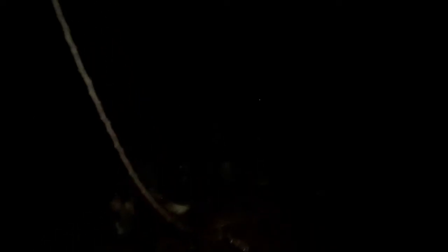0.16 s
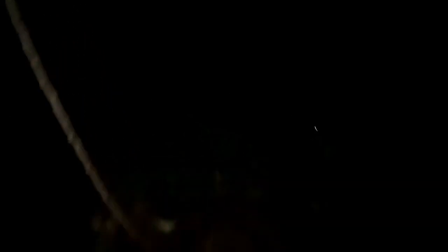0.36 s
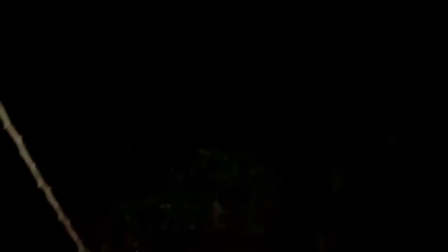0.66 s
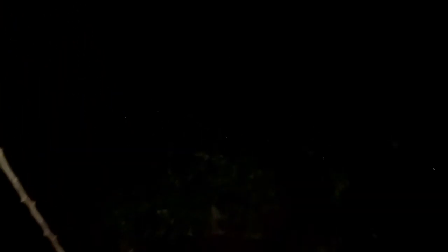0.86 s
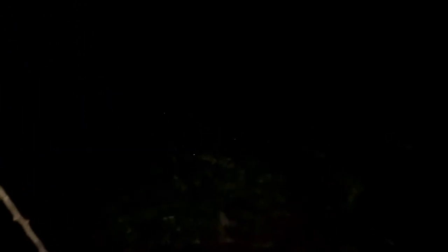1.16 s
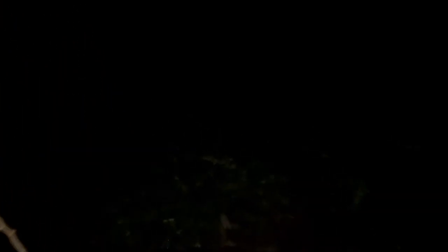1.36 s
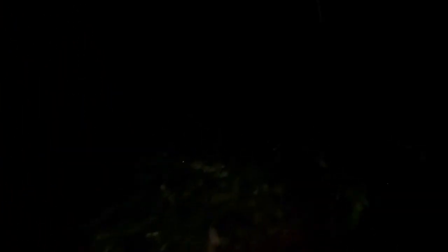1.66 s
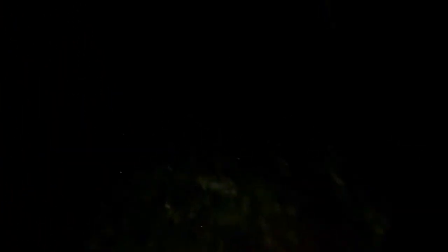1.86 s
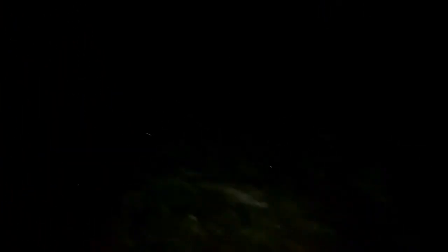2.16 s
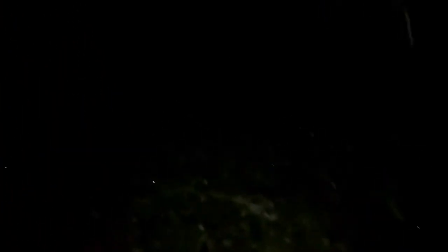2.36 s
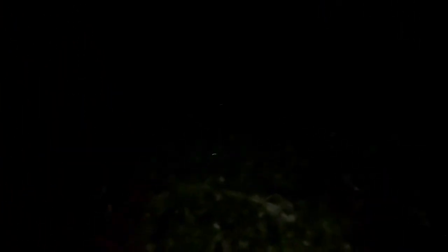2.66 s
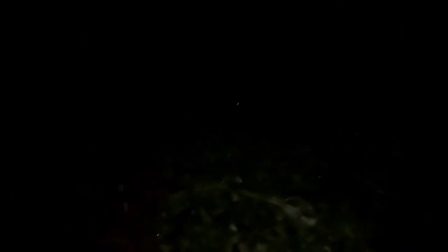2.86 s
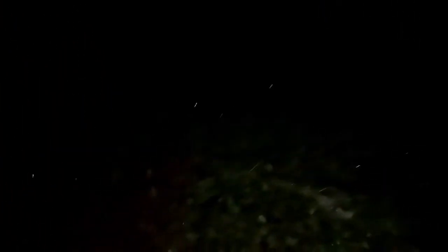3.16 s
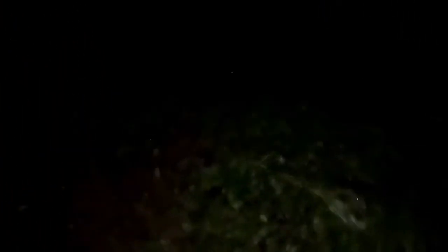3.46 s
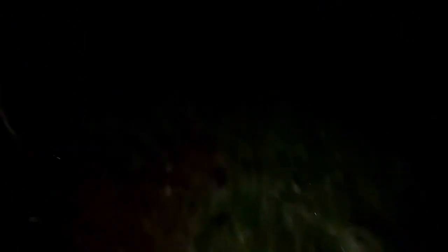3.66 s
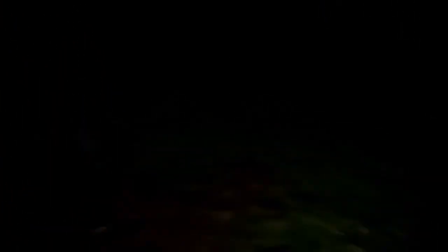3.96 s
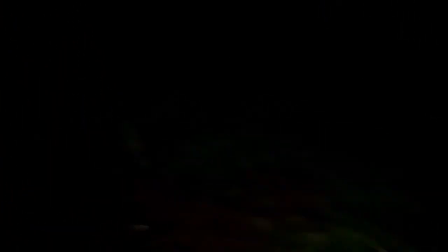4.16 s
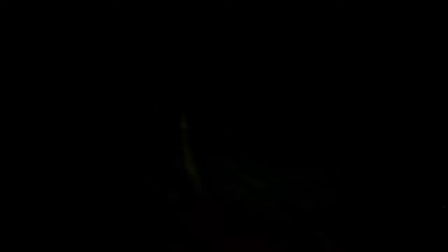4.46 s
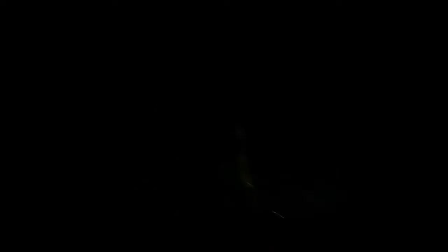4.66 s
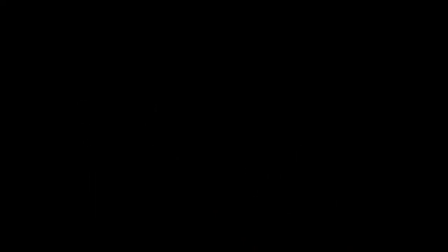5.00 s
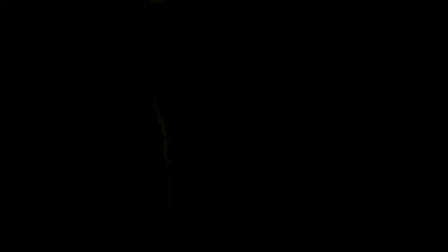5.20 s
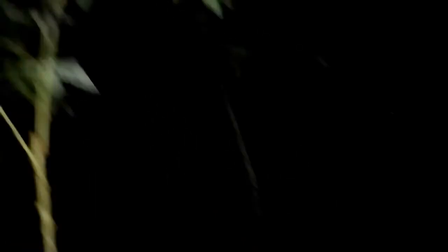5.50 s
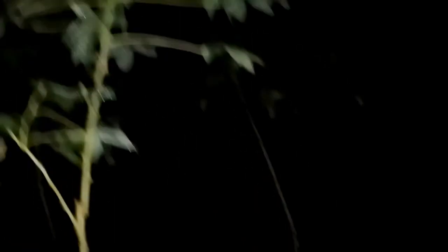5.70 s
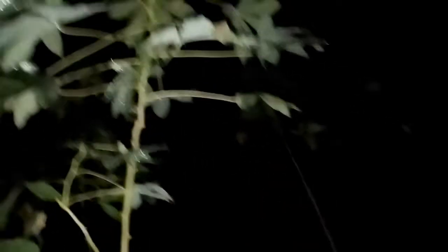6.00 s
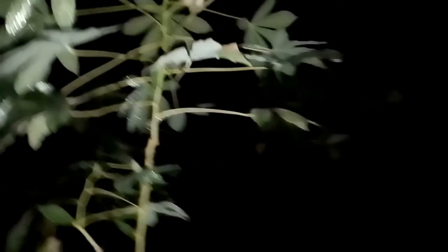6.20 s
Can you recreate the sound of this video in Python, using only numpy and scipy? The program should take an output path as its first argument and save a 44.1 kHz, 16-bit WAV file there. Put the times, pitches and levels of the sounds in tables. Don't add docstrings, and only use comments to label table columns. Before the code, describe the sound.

A dense outdoor night chorus without a pause: close, piercing cricket trills with a rough, fluttering edge, a quieter rapid purring chirp lower down, and a blurred hiss of far insects above. Dry, scratchy rasps pulse at the top of hearing, swelling around four seconds, then fading. Very faint traffic rumble and hum lie below. A few light taps come midway, then a cluster of twig knocks near six seconds, close to the moving hand-held microphone.

```python
import sys
import numpy as np
from scipy import signal
from scipy.fft import rfft, irfft, next_fast_len
from scipy.io import wavfile
from scipy.ndimage import uniform_filter1d, map_coordinates

SR = 44100
rng = np.random.default_rng(int(sys.argv[2]) if len(sys.argv) > 2 else 0)


def inscribe(sig):
    pcm = np.round(np.clip(np.atleast_2d(sig).T, -1, 1) * 32767)
    wavfile.write(sys.argv[1], SR, pcm.astype(np.int16))


def amplitude_ratio(level_db):
    exponent = np.asarray(level_db, float) / 20
    return 10 ** exponent


N = 279594
STEP = 16

# one comb line f/Hz, wing strokes/s, level/dB, direct share/1
CRICKETS = [
    (4252, 74.5, .5, .75),
    (4165, 71.2, 0, .75),
    (4178, 72.8, -1.5, .75),
]
# f/Hz, level/dB
WING_RESONANCES = [
    [(3600, -37), (3800, -34.5), (3960, -26), (4030, -9.5), (4100, -2.5), (4250, -6), (4400, -1.5),
     (4480, -14.5), (4600, -35.5), (4900, -55)],
    [(3600, -37), (3800, -21.5), (3960, -15), (4030, -10.5), (4100, -2.5), (4200, 4.5), (4380, -4),
     (4450, -13.5), (4600, -24), (4900, -29)],
    [(3600, -31.5), (3800, -17), (3960, -13.5), (4030, -10), (4100, -19), (4200, -1.5), (4380, -3.5),
     (4450, -10.5), (4600, -33.5), (4900, -30.5)],
]
# t/s, level/dB
TRILL_LEVEL = [(0.0, -46), (0.41, -44), (0.48, -51.5), (0.71, -48), (1.38, -53.5), (1.55, -45.5),
               (1.61, -51.5), (2.67, -44.5), (2.81, -50.5), (2.83, -44.5), (3.12, -50), (3.46, -44.5),
               (3.67, -48.5), (3.73, -43.5), (4.59, -48), (5.49, -44), (5.83, -46), (6.34, -45)]
# t/s, loudest pitch f/Hz
FACING = [(0, 4180), (.42, 4260), (.55, 4240), (1.4, 4278), (2.6, 4254), (2.95, 4286), (3.3, 4250),
          (4.0, 4250), (4.45, 4230), (4.65, 4090), (4.9, 4230), (5.3, 4247), (6.34, 4245)]
# t/s, delay/ms
BEAT_DELAY = [(0.0, 3.5), (0.35, 6), (1.05, 9), (2.1, 11.7), (2.6, 11.5), (3.15, 8), (3.5, 9.8),
              (4.7, 10.2), (5.25, 12.5), (6.34, 15.8)]
# start/ms, length/ms, first f/Hz, last f/Hz, level/dB
SYLLABLES = [
    (-9.5, 16.93, 2215, 2870, 8),
    (3, 14, 2230, 2470, -1),
    (14.5, 17.6, 2240, 2200, -11.5),
]
# t/s, level/dB, share of pitch rise/1, overtone level/dB
LOW_SINGER = [(0.0, -67, 0.95, -22), (0.83, -64, 0.93, 0), (1.18, -64.5, 1, 0), (2.63, -66.5, 0.68, 0),
              (3.21, -65.5, 0.86, -33), (4.68, -66.5, 0.67, -9), (5.38, -64, 0.76, 0.5),
              (5.95, -67.5, 0.29, -13), (6.34, -67.5, 0.19, 8)]
# f/Hz, density/dB per Hz
CHORUS_COLOUR = [(5000, -28.5), (5400, -16), (5700, -0.5), (5850, 1), (6020, -7), (6250, -0.5),
                 (6500, -4.5), (6700, -1.5), (7100, -7), (7400, -5), (7800, -9), (8300, -14.5),
                 (9500, -22.5), (11000, -29.5)]
# middle t/s, half length/s, rise/dB
WHISTLE_PHRASES = [
    (1.55, 0.22, 8),
    (4.35, 0.39, 14),
    (6.15, 0.75, 17),
]
# f/Hz, density/dB per Hz
AIR_COLOUR = [(20, -13), (70, -15), (105, -13), (150, -36), (200, -1.5), (300, 0), (650, -6), (1200, -10),
              (2000, -7), (2400, 5.5), (2700, -3), (2950, 0.5), (3500, -1.5), (5000, -2), (10000, -14.5),
              (15000, -10)]
# middle t/s, half length/s, rise/dB
TRAFFIC_PASSES = [
    (1.6, 0.35, 16),
    (2.25, 0.27, 14.5),
    (3.39, .04, 19.5),
    (3.56, 0.032, -1),
    (6.05, 0.52, 16),
]
# f/Hz, level/dB
MOTORS = [
    (101, -93.5),
    (119.7, -97.5),
]
# middle t/s, half length/s, rise/dB
HUM_SWELLS = [
    (5.75, .28, 7),
    (3.1, .2, -9),
]
# t/s, strokes so far/1, level/dB
RASP_STROKES = [(0.08, 0, -76), (0.485, 6, -72.5), (1.305, 18, -72), (1.5, 21, -77), (1.85, 26, -79),
                (2.14, 30, -75), (2.82, 40, -72), (2.95, 42, -69), (3.285, 47, -72.5), (3.597, 52, -72),
                (4.005, 58, -66), (4.277, 62, -66.5), (4.42, 64, -71), (4.68, 68, -74), (4.905, 71, -80),
                (6.31, 92, -78)]
# f/Hz, density/dB per Hz
RASP_COLOUR = [(9000, -31), (11500, -5), (13500, -4), (14500, -7), (15300, 9), (17000, 0)]
# t/s, peak level/dB, f/Hz, t60/s, crack level/dB
TWIG_TICKS = [(1.892, -67, 1130, 0.012, -1.5), (3.375, -71, 320, 0.066, -22),
              (3.521, -56, 1560, 0.0085, -19), (3.55, -62, 296, 0.049, -20),
              (5.287, -62.5, 433, 0.037, -12), (5.389, -57, 413, 0.014, -14), (5.756, -72, 3300, .008, -3),
              (5.85, -58, 2960, 0.012, -6), (5.96, -54.5, 2750, 0.006, -16), (5.962, -61, 705, 0.022, -20),
              (6.005, -51, 693, 0.034, -4), (6.005, -48, 930, 0.0093, -27),
              (6.006, -66.5, 1510, 0.042, -20), (6.06, -63.5, 250, 0.086, -20)]
# f/Hz, level/dB
CRACK_COLOUR = [(450, -48), (700, -6), (1500, -4), (3500, 3), (6000, -28), (12000, -25)]

FLICKER_DB, LEAN_DB_PER_HZ = 1.13, 0.09
CHIRP_RATE_HZ, THROB_RATE_HZ = 23.49, 8.3
CHORUS_DB, HIGH_WHISTLE_DB, LOW_WHISTLE_DB, RUMBLE_DB = -59, -79, -77.5, -82
STROKE_MS, STROKE_SPREAD_MS, LATE_MS, UNEVEN_DB = 31, 4, 2.5, 1.3
VALLEY_LOW_HZ, VALLEY_HIGH_HZ, TOP_HZ = 4780, 5200, 15600


def unit(x):
    return x / np.sqrt(np.mean(np.abs(x) ** 2) + 1e-20)


def curves(rows):
    s, *cols = np.transpose(rows)
    return [np.interp(np.arange(N) / SR, s, c) for c in cols]


def wobble(rate_hz):
    knots = rng.standard_normal(400 + N // 100)
    return map_coordinates(knots, [np.arange(N) * rate_hz / SR], order=1)


def swells(rows):
    t = np.arange(N) / SR
    return sum(db * np.exp(-((t - s) / half_s) ** 2) for s, half_s, db in rows)


def coloured(x, points):
    m = next_fast_len(N + 8192)
    f, db = np.transpose(points)
    hz = np.fft.rfftfreq(m, 1 / SR)
    gain = amplitude_ratio(np.interp(np.log(hz + 1), np.log(f), db))
    return irfft(rfft(x, m) * gain, m)[:N]


def patchy(patchy_db):
    z = signal.stft(rng.standard_normal(N), nperseg=512)[2]
    field = uniform_filter1d(rng.standard_normal(z.shape), 5, 0)
    field = unit(uniform_filter1d(field, 16, 1))
    return signal.istft(z * amplitude_ratio(patchy_db * field), nperseg=512)[1][:N]


def fading(narrow_hz, wide_hz, wide_db):
    knots = rng.standard_normal((2, 2, next_fast_len(N // STEP + 1)))
    hz = np.fft.fftfreq(knots.shape[-1], STEP / SR)
    slow, fast = knots[0] + 1j * knots[1]
    slow = unit(np.fft.ifft(slow / (1 + (hz / narrow_hz) ** 2)))
    fast = unit(np.fft.ifft(fast / (1 + (hz / wide_hz) ** 4)))
    return unit(slow + amplitude_ratio(wide_db) * fast)[:N // STEP + 1]


def carried(envelope, hz):
    full = signal.resample_poly(envelope, STEP, 1)[:N]
    return np.real(full * np.exp(2j * np.pi * hz * np.arange(N) / SR))


def steadied(x, size):
    return x / np.sqrt(np.abs(uniform_filter1d(np.abs(x) ** 2, size, axis=-1)) + 1e-20)


def leaves(x, t60_s, wet_db):
    hop = SR // 4
    t = np.arange(hop) / SR
    out = np.zeros(N + 3 * hop)
    padded = np.pad(x, (hop, 2 * hop))
    for i in range(0, N + hop, hop):
        tail = rng.standard_normal(hop) * amplitude_ratio(-60 * t / t60_s)
        piece = padded[i:i + 2 * hop] * np.hanning(2 * hop)
        echo = signal.fftconvolve(piece, tail / np.linalg.norm(tail))
        echo = echo[max(hop - i, 0):]
        out[max(i - hop, 0):][:len(echo)] += echo
    return x + amplitude_ratio(wet_db) * out[:N]


def trill():
    (level_db,), (pitch_hz,) = curves(TRILL_LEVEL), curves(FACING)
    turn_hz = np.pad(pitch_hz - pitch_hz.mean(), (0, STEP), 'edge')[::STEP][:N // STEP + 1]
    tilt_db = LEAN_DB_PER_HZ * turn_hz
    t = np.arange(len(tilt_db)) * STEP / SR
    song, centre_hz = np.zeros(len(t), complex), 4200
    for (line_hz, stroke_hz, db, share), resonance in zip(CRICKETS, WING_RESONANCES):
        direct = fading(narrow_hz=5, wide_hz=15, wide_db=-6)
        for k in np.arange(-9, 10):
            hz = line_hz + k * stroke_hz
            path = fading(narrow_hz=8, wide_hz=45, wide_db=abs(k) / 2 - 5) + share * direct
            sweep = 0.278 * k * k
            lean = np.interp(hz - centre_hz, [-450, -150, 200, 450], [0, -1, 1, 0])
            level = amplitude_ratio(db + np.interp(hz, *np.transpose(resonance)) + lean * tilt_db)
            song += level * path * np.exp(1j * (2 * np.pi * (hz - centre_hz) * t + sweep))
    gain = amplitude_ratio(level_db + 4 + FLICKER_DB * wobble(12))
    return gain * carried(steadied(song, size=280), centre_hz)


def beat():
    return (np.arange(N) / SR - curves(BEAT_DELAY)[0] / 1000) * CHIRP_RATE_HZ + 2


def chirper():
    level_db, rise_share, overtone_db = curves(LOW_SINGER)
    tone, overtone = np.zeros(N), np.zeros(N)
    for start_ms, length_ms, first_hz, last_hz, db in SYLLABLES:
        cycles = beat() - start_ms / 1000 * CHIRP_RATE_HZ
        pitch, size, start, rise = rng.standard_normal((200, 4))[cycles.astype(int)].T
        t, life_s = cycles % 1 / CHIRP_RATE_HZ, length_ms / 1000
        rise_hz = (last_hz - first_hz) * (1 + .35 * rise) * rise_share
        turns = t * (first_hz + rise_hz * (t / life_s) ** 3 / 4)
        phase = 2 * np.pi * ((1 + 0.0066 * pitch) * turns + start)
        shape = amplitude_ratio(db + 1.8 * size) * np.sin(np.pi * np.clip(t / life_s, 0, 1))
        tone += shape * np.sin(phase)
        overtone += shape * np.sin(3 * phase)
    near = steadied(leaves(tone, t60_s=.07, wet_db=-5), size=7510)
    far = unit(leaves(overtone, t60_s=0.069, wet_db=1.0))
    return amplitude_ratio(level_db - 2) * (near + amplitude_ratio(overtone_db) * far)


def chorus():
    throb = np.cos(2 * np.pi * (beat() - .2))
    band_db = CHORUS_DB + .5 * wobble(2.1) - 0.8 + 0.44 * wobble(35)
    band = amplitude_ratio(band_db) * unit(coloured(patchy(patchy_db=2.0), CHORUS_COLOUR))
    pulsing = coloured(band, [(5900, -1), (6200, -10.0), (9000, 1.0)])
    band = band + (amplitude_ratio(2 * throb) - 1) * pulsing
    high = carried(fading(narrow_hz=25.1, wide_hz=68, wide_db=-16), hz=6330) * (1 + .5 * throb)
    high = amplitude_ratio(HIGH_WHISTLE_DB + swells(WHISTLE_PHRASES)) * high
    low = carried(fading(narrow_hz=30, wide_hz=90, wide_db=-3), hz=2895) * amplitude_ratio(1.5 * wobble(9))
    low = amplitude_ratio(LOW_WHISTLE_DB + 2.2 * wobble(0.92)) * low
    return band + high + low


def air():
    t = np.arange(N) / SR
    floor = amplitude_ratio(-65) * unit(coloured(patchy(patchy_db=1.18), AIR_COLOUR))
    rumble_colour = [(170, -21), (220, -9.5), (330, -2), (450, -9.0), (750, -25.5)]
    rumble = unit(coloured(patchy(patchy_db=3.0), rumble_colour))
    rumble = amplitude_ratio(RUMBLE_DB + swells(TRAFFIC_PASSES) - 7) * rumble
    throb = np.sin(2 * np.pi * np.cumsum(THROB_RATE_HZ + 2.5 * wobble(3)) / SR)
    load_db = swells(HUM_SWELLS) + 1.5 * wobble(6) + 8 * throb
    hum = sum(amplitude_ratio(db + load_db) * np.sin(2 * np.pi * hz * t) for hz, db in MOTORS)
    return floor + hum + rumble


def rasp():
    gate, t = np.zeros(N + SR), np.arange(SR // 10) / SR
    when_s, number, level_db = np.transpose(RASP_STROKES)
    strokes = np.arange(number[-1] + 1)
    luck = rng.standard_normal((len(strokes), 3))
    for n, (late, longer, louder) in zip(strokes, luck):
        s = np.interp(n, number, when_s) + LATE_MS / 1000 * late
        length_s = (STROKE_MS + STROKE_SPREAD_MS * longer) / 1000
        attack = np.clip(t / 0.0022, 0, 1) * (1 + .6 * np.exp(-t / 0.0024))
        release = np.clip((length_s + 0.0035 - t) / 0.0048, 0, 1)
        level = amplitude_ratio(np.interp(n, number, level_db) + UNEVEN_DB * louder)
        gate[round(s * SR):][:len(t)] += level * attack * release
    teeth = unit(coloured(rng.standard_normal(N) * amplitude_ratio(3 * wobble(900)), RASP_COLOUR))
    return amplitude_ratio(3.5) * gate[:N] * teeth


def ticks():
    rings, cracks, t = np.zeros(N + SR), np.zeros(N + SR), np.arange(SR // 8) / SR
    for s, db, hz, t60_s, crack_db in TWIG_TICKS:
        i = round(s * SR)
        ring = np.sin(2 * np.pi * hz * t) * (1 - np.exp(-t / 0.00057))
        rings[i:][:len(t)] += amplitude_ratio(db - 60 * t / t60_s) * ring
        crack = rng.standard_normal(len(t)) + 8 * (t == 0)
        cracks[i:][:len(t)] += amplitude_ratio(db + crack_db + 16.5 - 60 * t / 0.0038) * crack
    dull = coloured(rings[:N], [(120, -30), (220, -1), (9000, 20.0)])
    return dull + coloured(cracks[:N], CRACK_COLOUR)


def masked(x):
    f, _, z = signal.stft(x, SR, nperseg=1024)
    hz = f[:, None]
    trill_db = 10 * np.log10(uniform_filter1d(np.sum(np.abs(z) ** 2, axis=0), size=7) + 1e-12)
    chance = uniform_filter1d(rng.standard_normal(z.shape), 3, 0)
    chance_db = 2 * unit(uniform_filter1d(chance, 4, 1))
    slope_db = 4 * (VALLEY_HIGH_HZ - hz) / (VALLEY_HIGH_HZ - VALLEY_LOW_HZ)
    loud = trill_db - np.median(trill_db) + chance_db - slope_db > -1.8
    emptied = loud & (slope_db > 0) & (slope_db < 4)
    return signal.istft(z * (~emptied & (hz < TOP_HZ)), SR, nperseg=1024)[1][:N]


def scene():
    return (trill() + chirper() + chorus() + air() + rasp() + ticks())[None]


def top_cut(x):
    return signal.sosfilt(signal.butter(12, 15670, fs=SR, output="sos"), x)


def record(dry):
    mix = masked(dry[0])[None] - .0003
    return top_cut(mix)


dry = scene()
out = record(dry)
inscribe(out)
```